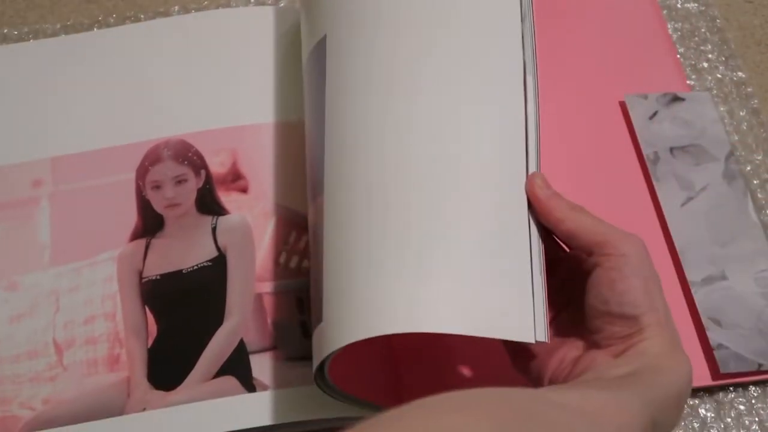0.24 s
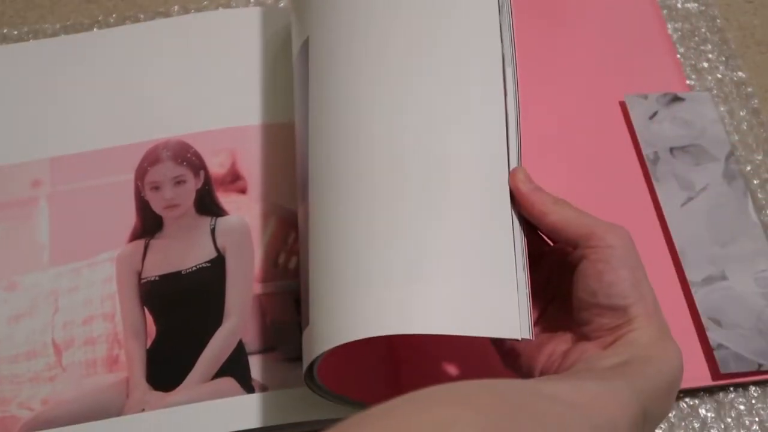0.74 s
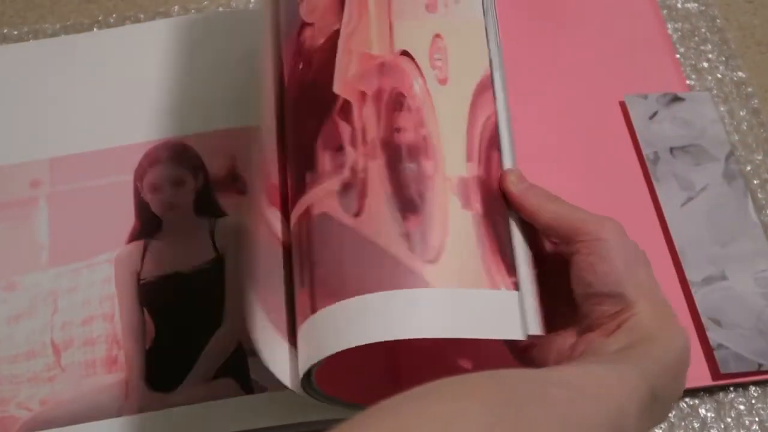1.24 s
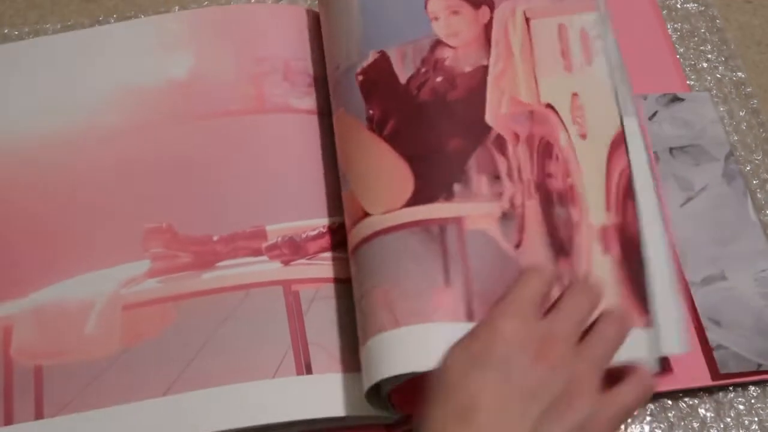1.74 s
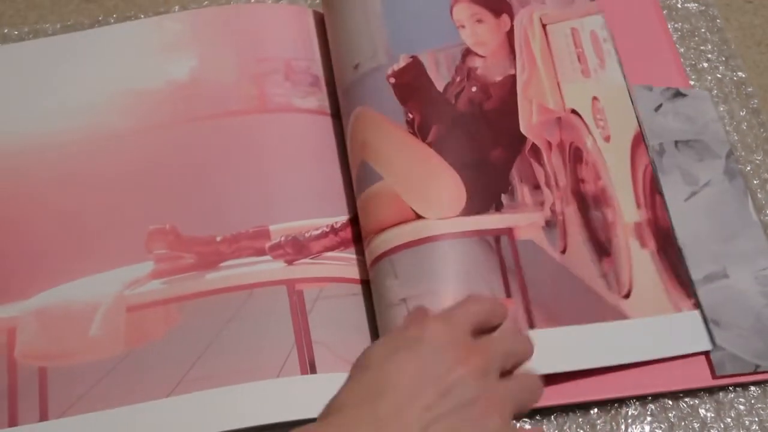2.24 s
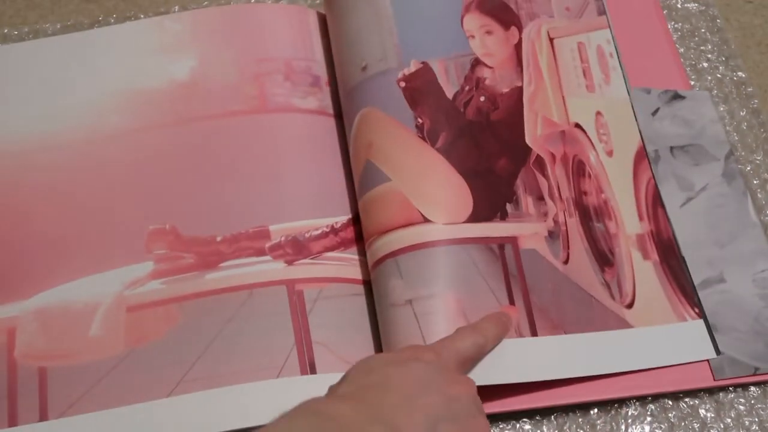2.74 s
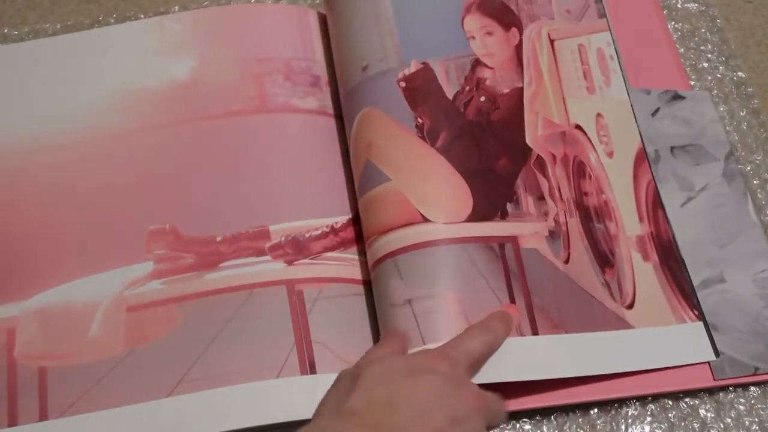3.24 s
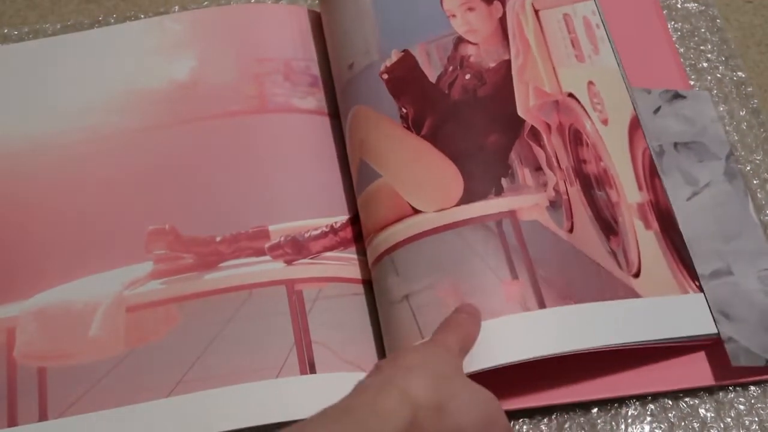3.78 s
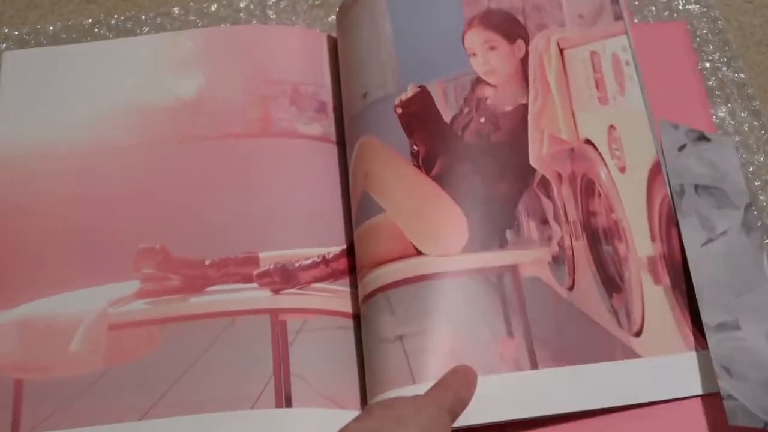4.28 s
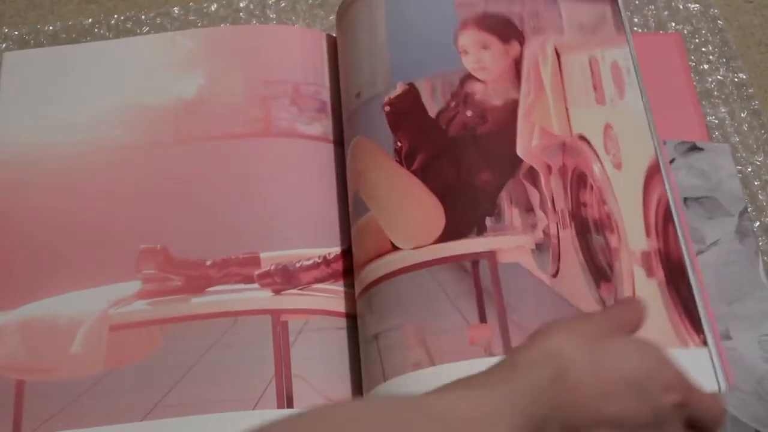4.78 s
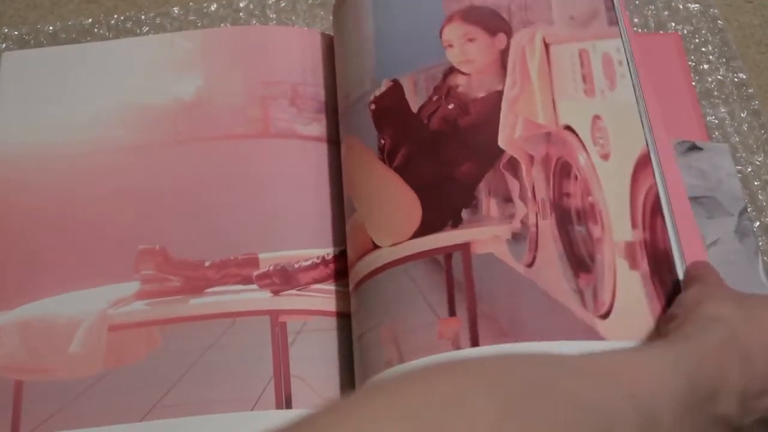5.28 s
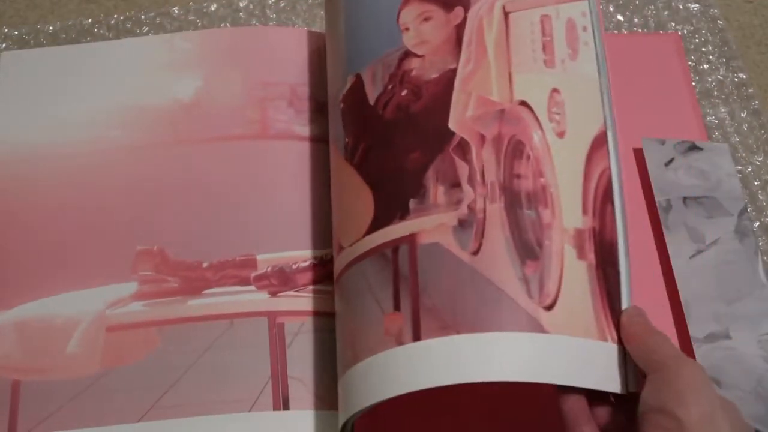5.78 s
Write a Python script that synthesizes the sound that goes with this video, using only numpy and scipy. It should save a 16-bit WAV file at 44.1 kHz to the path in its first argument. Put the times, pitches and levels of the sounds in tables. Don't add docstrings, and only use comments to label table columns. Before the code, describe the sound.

Stiff glossy pages of a large book are turned by hand, with faint rustles, papery flaps and a sharp loud snap over quiet room rumble.

```python
import sys
import numpy as np
from scipy import signal
from scipy.fft import rfft, irfft
from scipy.io import wavfile
from scipy.ndimage import uniform_filter1d

SR = 44100
rng = np.random.default_rng(int(sys.argv[2]) if len(sys.argv) > 2 else 0)


def to_wav(sig):
    pcm = np.clip(np.atleast_2d(sig), -1, 1) * 32767
    pcm = np.round(pcm).astype(np.int16)
    wavfile.write(sys.argv[1], SR, pcm.T)


def how_loud(loudness_db):
    steps = np.asarray(loudness_db, float) / 20
    return 10 ** steps


N = 265482
TOP_HZ = 13150


def evened(x):
    return x / np.sqrt(np.mean(x ** 2) + 1e-20)


def read(points, hz):
    f, value = np.transpose(points)
    return np.interp(np.log(hz + 1), np.log(f + 1), value)


def add(mix, s, sound):
    part = mix[round(s * SR):][:len(sound)]
    part += sound[:len(part)]


def fall(t60, rise_s):
    t = np.arange(9000) / SR
    return (1 - np.exp(-t / rise_s)) * how_loud(-60 * t / max(t60, .01))


def shaped(x, envelope):
    return x * envelope * np.linalg.norm(envelope) / np.linalg.norm(x * envelope)


def resonate(x, hz, width):
    r = np.exp(-np.pi * width / SR)
    return signal.lfilter([1 - r, 0, r - 1], [1, -2 * r * np.cos(2 * np.pi * hz / SR), r * r], x)


def sheet(x, modes):
    return evened(sum(how_loud(db) * resonate(resonate(x, hz, w), hz, 3 * w) for hz, w, db in modes))


def bent(modes, bend):
    return [(hz * b, w, db) for (hz, w, db), b in zip(modes, bend)]


def crackle(shape, spread_db, clump_s):
    clumps = evened(uniform_filter1d(rng.standard_normal(shape), max(round(clump_s * SR), 1)))
    return evened(rng.standard_normal(shape) * how_loud(spread_db * clumps))


def air():
    # (frequency [Hz], level per Hz [dB])
    floor = [(12, -49), (20, -16.5), (107, -5.5), (184, -15.5), (276, -14.5), (308, -13), (404, -16),
             (732, -20.5), (1010, -22), (1260, -22.5), (1790, -25), (2340, -26), (12900, -45.5),
             (16800, -68), (22000, -120)]
    # (frequency [Hz], likeness [-1 to 1])
    likeness = [(60, 1), (120, 0.98), (240, 0.27), (480, -0.51), (950, -0.18), (1890, -0.47), (3770, -0.27),
                (7520, -0.17), (15000, -0.08)]
    floor_db, step_db = -51, 16
    frames, hz = N // 512 + 5, np.fft.rfftfreq(2048, 1 / SR)
    a, b, c, d, patches = rng.standard_normal((frames, 1025, 5)).T
    patches = evened(uniform_filter1d(uniform_filter1d(patches, 20, axis=0), 6, axis=1))
    same = np.clip(read(likeness, hz), -1, 1)[:, None]
    both = np.sqrt((1 + same) / 2) * (a + 1j * b)
    apart = np.sqrt((1 - same) / 2) * (c + 1j * d)
    colour_db = read(floor, hz) - step_db * (hz > TOP_HZ)
    z = np.array([both + apart, both - apart]) * how_loud(colour_db[:, None] + 1.5 * patches)
    return how_loud(floor_db) * evened(signal.istft(z, nperseg=2048, noverlap=1536)[1][:, :N])


def whine():
    # (frequency [Hz], level [dB])
    tones = [(13018, -78.5)]
    t, sides = np.arange(N) / SR, np.array([[0.95], [-0.95]])
    return sum(np.sqrt(2) * how_loud(db) * np.sin(2 * np.pi * hz * t + sides) for hz, db in tones)


def drone():
    # (time [s], level [dB])
    swell = [
        (0, -66),
        (.12, -56),
        (.3, -61),
        (.7, -59),
        (.9, -60),
        (1.2, -53),
        (1.45, -57),
        (1.8, -59.5),
        (2.0, -65),
        (2.2, -78),
    ]
    s, db = np.transpose(swell)
    t = np.arange(N) / SR
    turn = 2 * np.pi * 142.1 * t
    level = how_loud(np.interp(t, s, db, right=-120))
    return np.sqrt(2) * level * np.sin(turn + np.array([[.3], [-.3]]))


def room(x):
    # (frequency [Hz], t60 [s])
    walls = [(200, 0.39), (1000, 0.039), (4000, 0.19), (12000, 0.27)]
    taps = np.zeros((2, SR // 2))
    starts = np.arange(200, SR // 2 - 20, 20)
    at = starts + rng.integers(0, 20, (2, len(starts)))
    np.put_along_axis(taps, at, rng.choice([-1., 1.], at.shape), 1)
    hz, t, z = signal.stft(taps, SR, nperseg=256)
    tail = signal.istft(z * how_loud(-60 * t / read(walls, hz)[:, None]), SR, nperseg=256)[1]
    return signal.fftconvolve(x[None], tail / np.linalg.norm(tail[0]), axes=1)[:, :N]


def ports(x):
    # (frequency [Hz], level [dB])
    difference = [(60, -32), (180, -37), (550, -52), (1650, -18), (4970, 2.5), (15000, 12.5)]
    hz, t, z = signal.stft(x, SR, nperseg=128)
    phase = 2 * np.pi * rng.random(z.shape[::-1]).T
    gain = how_loud(read(difference, hz) - 5.5)[:, None]
    apart = signal.istft(z * np.exp(1j * phase) * gain, SR, nperseg=128)[1][:N]
    return np.array([x + apart, x - apart])


def pile(x):
    # (frequency [Hz], width [Hz], level [dB])
    book_modes = [(300, 60, -2), (405, 50, -2), (590, 70, 2), (1120, 110, 2), (1650, 150, -4),
                  (1990, 160, 2), (2720, 200, 0), (3600, 260, 2), (5300, 300, -4)]
    through_db, past_db = -5.6, -2
    through = sum(how_loud(db) * resonate(x, hz, w) for hz, w, db in book_modes)
    return how_loud(past_db) * x + how_loud(through_db) * through


def drag():
    # (time [s], frequency [Hz], level [dB])
    path = [(1.72, 3500, -75), (1.76, 3800, -66), (1.83, 4200, -63), (1.88, 5000, -58), (1.92, 6040, -61),
            (1.97, 4560, -61), (2.02, 3800, -68), (2.1, 3000, -95), (3.3, 2200, -95), (3.36, 2400, -55),
            (3.39, 2680, -48), (3.44, 2800, -57), (3.5, 3000, -72), (4.7, 4200, -90), (4.77, 4200, -57),
            (4.84, 4000, -80), (5.18, 4000, -73), (5.28, 4200, -60)]
    s, hz, db = np.transpose(path)
    t = np.arange(N) / SR
    turn = np.exp(2j * np.pi * np.cumsum(np.interp(t, s, hz)) / SR)
    r = np.exp(-np.pi * 1100 / SR)
    hiss = (turn * signal.lfilter([1], [1, -2 * r, r * r], crackle(N, 2.2, .003) / turn)).real
    return how_loud(np.interp(t, s, db, left=-120, right=-120)) * evened(hiss)


def rub():
    # (time [s], pressure [dB], flat of the hand against fingertip [dB])
    strokes = [(0.0, -66.5, 2.5), (0.92, -67, 6.5), (1.38, -66.5, 2), (1.77, -63, 5), (1.906, -56.5, -3.5),
               (2.08, -52, 6.5), (2.22, -59, 10), (2.35, -52, 6), (2.5, -66.5, 0.5), (3.3, -66.5, 11),
               (3.4, -58.5, 5.5), (3.62, -62, 6), (3.95, -57.5, 4), (4.1, -48.5, 3), (4.234, -55, 2.5),
               (4.36, -61.5, 2.5), (5.2, -64, 3), (6.02, -66, 9)]
    place_hz = [170, 450, 1400, 3700, 7500, 15000]
    flat_share = [2.2, 0.67, 0.077, -0.48, -0.44, -1.64]
    s, pressure_db, flat_db = np.transpose(strokes)
    hz, t, z = signal.stft(crackle(N, 1.6, 0.011), SR, nperseg=512, noverlap=384)
    place_db = np.array([[-6], [15], [6.5], [7.5], [0], [-6]])
    levels_db = pressure_db + np.outer(flat_share, flat_db) + place_db
    in_time = np.array([np.interp(t, s, db) for db in levels_db])
    place = np.interp(np.log(hz + 1), np.log(place_hz), np.arange(len(place_hz)))
    low = np.minimum(place.astype(int), len(place_hz) - 2)
    field_db = in_time[low] + (place - low)[:, None] * (in_time[low + 1] - in_time[low])
    patches = uniform_filter1d(rng.standard_normal(z.shape[::-1]).T, 3, axis=0)
    patches = evened(uniform_filter1d(patches, 10, axis=1))
    return signal.istft(z * how_loud(field_db + 1.46 * patches), SR, nperseg=512, noverlap=384)[1][:N]


def both_kinds(dull, fizz_db, crisp, note_db):
    dull_rows = [(s, db, hz, db + low_db, db + fizz_db, span) for s, db, hz, span, low_db in dull]
    crisp_rows = [(s, db, hz, db + note_db, db + top_db, span) for s, db, hz, span, top_db in crisp]
    return sorted(dull_rows + crisp_rows)


def rustle(slips, bend, envelope, db, hz, note_db, fizz_db, width, wide):
    # (frequency [Hz], width [Hz], level [dB])
    scrape_modes = [(1090, 276, 21.6), (1550, 120, 19), (2000, 270, 42)]
    swish_modes = [(2580, 300, 1), (2860, 140, 2), (3400, 310, 3), (4200, 160, 2.5), (4760, 940, -3)]
    fizz_modes = [(6100, 1960, 19.5), (8300, 4700, 6), (10600, 11000, -13)]
    body = sheet(slips, bent(swish_modes, bend)) + 0.72 * sheet(slips, bent(scrape_modes[1:], bend[::-1]))
    ring = evened(resonate(resonate(slips, hz, width), hz, 4 * width))
    patch = shaped(ring + wide * how_loud(0.057 * (db + 49)) * body, envelope)
    note = shaped(sheet(slips, scrape_modes[:2]), envelope)
    fizz = shaped(sheet(slips, fizz_modes), envelope)
    return how_loud(db) * patch + how_loud(note_db) * note + how_loud(fizz_db) * fizz


def brushes():
    # (time [s], peak [dB], ring [Hz], length [s], low note [dB])
    pads = [(1.831, -47.5, 3880, 0.12, -17), (1.9836, -43, 3700, 0.083, -16),
            (2.0294, -44, 3670, 0.15, -12), (2.25, -50, 1890, 0.055, 6.5), (2.278, -64, 3400, 0.031, -15.5),
            (3.3435, -41.5, 2000, 0.18, -6), (3.364, -38, 2700, 0.14, -17),
            (3.3837, -34, 2300, 0.075, -2.5), (3.474, -43.5, 3000, 0.042, 2.5),
            (3.568, -45.5, 1900, 0.079, -3), (4.2005, -37.5, 1860, 0.084, -3.5),
            (4.2994, -52, 3360, 0.07, -1), (4.76, -45, 3460, 0.08, -15), (4.8415, -49.5, 3360, 0.043, 1),
            (4.891, -50, 3400, 0.097, -4), (5.2666, -44, 3260, 0.075, -16), (5.72, -49.5, 2380, 0.05, -5),
            (5.9765, -50, 2500, 0.092, -5)]
    # (time [s], peak [dB], ring [Hz], length [s], crispness [dB])
    swipes = [(1.528, -56.5, 2400, 0.09, 3), (1.742, -47.5, 3840, 0.25, -5), (1.8664, -51, 4000, 0.13, 5.5),
              (1.917, -55, 2000, 0.053, 8.5), (3.418, -40.5, 2000, 0.061, -8),
              (3.712, -44.5, 1960, 0.057, -3.5), (4.489, -47.5, 2980, 0.064, -2),
              (4.51, -43.5, 2000, 0.069, -3.5), (4.571, -46.5, 1840, 0.087, -4.5),
              (4.597, -46, 3530, 0.059, -1), (4.652, -68, 5670, 0.15, 12), (4.762, -56, 6000, 0.083, 4.5),
              (4.97, -52, 3400, 0.045, -4), (5.225, -47.5, 4200, 0.11, -8.5), (5.53, -53, 2630, 0.12, -6)]
    rows = both_kinds(pads, -15, swipes, -4)
    out, t = np.zeros(N), np.arange(9000) / SR
    bends = 1 + 0.079 * rng.standard_normal((len(rows), 5))
    slips = crackle((len(rows), 9000), 2.2, .002)
    for (s, *colour, length), slip, bend in zip(rows, slips, bends):
        u = t / (0.22 * max(length, .01))
        add(out, s - .008, how_loud(-9.5) * rustle(slip, bend, u * np.exp(1 - u), *colour, 370, 0.79))
    return out


def ticks():
    # (time [s], peak [dB], frequency [Hz])
    releases = [(1.0084, -41, 2210), (1.4591, -43, 4550), (1.714, -37, 2310), (2.0727, -52, 3880),
                (2.079, -20, 2930), (2.093, -21, 3660), (2.0974, -34, 3630), (2.3375, -17.5, 2900),
                (2.075, -27, 4700), (2.349, -28, 4000), (2.0855, -30, 3000), (1.7125, -32, 1500),
                (3.835, -38, 3800), (4.1128, -14, 620), (2.137, -36, 3400), (2.181, -38, 3000),
                (2.206, -38, 2000), (2.234, -39, 2100), (2.258, -39, 1300), (2.29, -40, 900),
                (4.19, -36, 1200), (4.227, -38, 4500), (4.254, -39, 3300), (4.155, -34, 2500),
                (3.917, -37, 2800), (3.7, -39, 2100), (2.598, -39, 5140), (3.69, -20.5, 6100),
                (3.834, -36, 2090), (3.87, -24, 2600), (3.874, -18, 2060), (3.882, -36, 3000),
                (3.9, -33, 2500), (4.0142, -22, 2740), (4.012, -24, 3600), (4.1083, -10.5, 3400),
                (4.115, -21, 2670), (4.12, -14, 1600), (4.1215, -16, 3500), (4.113, -19, 890),
                (4.05, -32, 3500), (4.071, -32, 3500), (4.165, -32, 3000), (4.214, -34, 2000),
                (4.074, -34, 1500), (3.652, -38, 1500), (2.221, -36, 1500), (4.1088, -11, 900),
                (4.133, -22, 3500), (4.168, -33, 4000), (4.3, -42, 3420), (4.4403, -30.5, 2000),
                (4.596, -32, 3450), (5.134, -45, 3550), (5.4056, -36, 1090), (5.9495, -41, 1500)]
    out, t = np.zeros(N), np.arange(400) / SR
    for s, db, hz in releases:
        add(out, s + 0.000997, -how_loud(db + 2) * np.sin(2 * np.pi * hz * t) * np.exp(-t * hz * 2.2))
    return signal.lfilter(*signal.butter(2, [500, 7500], "band", fs=SR), out)


def rings():
    # (time [s], peak [dB], frequency [Hz], t60 [s])
    damped_notes = [(0.452, -49, 1220, 0.074), (2.149, -45, 2610, .03), (2.19, -50, 2000, .03),
                    (2.25, -54, 2000, .3), (2.19, -44, 3590, .035), (2.221, -47.5, 1130, .12),
                    (2.249, -42, 3200, .02), (2.283, -45, 3500, .03), (2.315, -46, 2120, 0.067),
                    (3.512, -33, 714, 0.054), (3.65, -43, 300, .05), (3.69, -47, 270, 0.069),
                    (3.872, -42, 297, .15), (3.884, -29.5, 593, 0.088), (3.875, -36, 1090, 0.076),
                    (4.012, -36, 2780, 0.032), (4.03, -44, 1130, .05), (4.07, -41, 333, .08),
                    (4.109, -27.5, 1396, 0.12), (4.111, -40, 1000, .06), (4.111, -28.5, 1654, 0.062),
                    (4.119, -33, 1250, 0.1), (4.161, -33.5, 520, 0.13), (4.198, -48, 1950, .06),
                    (4.203, -41, 2700, .04), (4.203, -41, 3610, 0.057), (4.211, -47, 497, .1),
                    (4.441, -51, 3620, .08), (5.28, -56, 1080, .2), (5.975, -53, 1240, 0.19),
                    (1.459, -44, 650, 0.11), (1.784, -42.5, 316.6, 0.14), (1.825, -45, 325, 0.11),
                    (2.077, -34, 5970, 0.021), (2.0925, -31, 3610, 0.025), (2.0968, -21.5, 3630, 0.02),
                    (2.108, -36, 3610, 0.058), (2.3376, -28, 2000, 0.038), (2.3376, -20, 3500, 0.013),
                    (2.3485, -28, 2000, 0.06), (2.357, -36.5, 3690, 0.052), (3.5095, -41.5, 1607, 0.052),
                    (3.509, -40.5, 205, 0.12), (4.1093, -36, 3780, 0.041), (4.119, -41, 3680, 0.035),
                    (4.597, -56, 6100, .08), (4.884, -55.5, 5400, .08), (5.443, -46, 1034, 0.068),
                    (4.129, -34, 477, 0.16),
                    (2.34, -40, 1090, 0.12), (3.535, -45, 299, .15), (3.894, -45, 260, .15),
               (4.11, -36, 290, 0.087), (4.135, -37, 299, 0.16), (4.225, -41, 417, 0.079),
               (4.232, -45, 900, 0.07), (4.2, -47, 830, .12), (4.165, -40, 330, .07), (4.12, -44, 760, .06),
               (4.198, -42, 480, .05), (2.1, -40, 1100, .08), (2.078, -42, 1100, .05),
               (2.21, -50, 1130, .1), (3.509, -47, 3400, .03), (3.509, -52, 5000, .03),
               (2.33, -42, 1000, .04), (2.35, -40, 3900, .05), (2.384, -46, 3700, .05),
               (2.361, -38, 700, .05), (2.12, -46, 3450, .05), (2.145, -57, 5300, .1),
               (3.385, -42, 2100, .05), (3.367, -44, 2500, .05), (3.408, -46, 1100, .06),
               (3.42, -45, 2000, .05), (3.84, -48, 600, .04), (4.013, -36, 3600, .025),
               (1.72, -46, 650, .04), (1.745, -48, 950, .05), (1.81, -48, 750, .06), (1.726, -46, 130, .08),
               (4.755, -55, 4200, .1), (0.07, -54, 4000, .03), (0.22, -57, 3250, .05),
               (1.46, -53, 3400, .06), (5.96, -54, 2600, .1), (4.598, -51, 1106, .07),
               (4.142, -37, 560, .08), (4.215, -41.5, 598, .1), (3.873, -40, 1550, .06),
               (4.013, -40, 1700, .06), (4.85, -48.5, 993, 0.13), (5.133, -51, 3700, 0.037),
               (5.95, -55, 790, .04)]
    out, t = np.zeros(N), np.arange(9000) / SR
    for s, db, hz, t60 in damped_notes:
        add(out, s, how_loud(db) * np.sin(2 * np.pi * hz * t) * fall(t60, 0.00073))
    return out


def flaps():
    # (time [s], peak [dB], ring [Hz], t60 [s])
    landings = [(1.011, -53.5, 285, 0.14), (1.225, -69, 290, 0.1), (1.458, -43.5, 640, 0.15),
                (1.716, -41.5, 282, 0.15), (1.744, -45.5, 600, 0.56), (1.784, -46.5, 288, 0.12),
                (1.815, -49.5, 330, 0.2), (2.082, -39.5, 270, 0.26), (2.092, -27, 597, 0.34),
                (2.252, -49, 580, 0.26), (2.337, -36.5, 590, 0.24), (2.481, -44, 573, 0.081),
                (3.5105, -24, 620, 0.059), (3.525, -45, 600, 0.14), (3.689, -46, 390, 0.095),
                (3.835, -47, 600, 0.11), (3.875, -34, 275, 0.096), (3.885, -31.5, 600, 0.19),
                (4.014, -28.5, 439, 0.044), (4.029, -38, 400, 0.25), (4.1105, -25, 335, 0.05),
                (4.124, -25.5, 410, 0.32), (4.163, -34.5, 498, 0.12), (4.206, -38.5, 440, 0.13),
                (4.379, -51, 518, 0.092), (4.486, -43.5, 585, 0.079), (5.404, -42, 252, 0.075),
                (5.688, -49.5, 790, 0.17), (5.821, -50.5, 336, 0.11), (5.949, -55, 630, 0.12)]
    # (frequency [Hz], width [Hz], level [dB])
    body_modes = [(205, 23.5, 5.5), (314, 123, 1), (416, 160, -3), (583, 128, 5)]
    out, t = np.zeros(N), np.arange(9000) / SR
    for (s, db, hz, t60), slips in zip(landings, crackle((len(landings), 9000), 2.3, 0.0091)):
        clean = 0.28 + 0.09 * (db + 33.5) - 0.54 * (t60 - .12) + 0.53 * np.log2(hz / 420)
        clean = np.clip(clean, 0, .9)
        slap = how_loud(-5.5 + 1.3 * (db + 31)) * sheet(slips, [(1160, 230, 0)])
        rattle = 0.63 * evened(resonate(slips, hz, 117)) + 0.72 * sheet(slips, body_modes) + slap
        ring = 1.16 * np.sin(2 * np.pi * hz * t) * fall(0.073, 0.00075)
        rise_s = 0.00066 * how_loud(0.5 * max(-34 - db, 0))
        add(out, s, how_loud(db) * (clean * ring + (1 - clean) * shaped(rattle, fall(t60, rise_s))))
    return out


def snaps():
    # (time [s], peak [dB], ring [Hz], t60 [s], low note [dB])
    buckles = [(0.0722, -44.5, 4050, 0.063, -3), (0.2173, -45, 2310, 0.11, -1.5),
               (0.7138, -48, 2300, 0.091, 1), (1.1712, -47.5, 2630, 0.13, -3), (1.2792, -50, 2500, 0.13, 0),
               (2.071, -26.5, 1900, 0.22, -2), (2.0904, -30.5, 3680, 0.11, 4),
               (2.0971, -27.5, 3490, 0.066, 3), (2.149, -43, 2570, 0.12, -10),
               (2.1899, -44, 1920, 0.15, -3), (2.4633, -44.5, 2860, 0.32, -18),
               (3.509, -43, 1750, 0.11, -12), (3.8365, -44, 2130, 0.16, 1), (4.0123, -23, 2650, 0.081, -10),
               (4.0485, -32, 1780, 0.07, -13), (4.0693, -36, 1990, 0.083, -15),
               (4.1322, -26.5, 2310, 0.24, -14.5), (4.4412, -47, 3500, 0.47, 0.5),
               (5.1332, -42.5, 3680, 0.23, -1.5), (5.404, -59, 2000, 0.11, -1), (5.441, -46, 3200, 0.2, -3)]
    # (time [s], peak [dB], ring [Hz], t60 [s], crispness [dB])
    edge_snaps = [(0.4522, -56, 4300, 0.12, -1), (1.007, -52, 2260, 0.074, 5.5),
                  (1.456, -50, 4550, 0.25, 0), (1.7117, -43, 2300, 0.23, -12.5),
                  (2.3365, -24.5, 1900, 0.15, -17.5), (2.348, -39, 2000, 0.055, -11),
                  (2.5974, -55, 5230, 0.17, 9.5), (3.6913, -39, 6000, 0.076, -2),
                  (3.8696, -32, 2700, 0.2, -8), (4.108, -14, 2570, 0.078, -5.5),
                  (4.1184, -20, 3690, 0.081, -9), (4.164, -43.5, 4040, 0.3, 3.5),
                  (5.9483, -47, 2580, 0.12, -6)]
    rows = both_kinds(buckles, -14, edge_snaps, -4)
    out, bends = np.zeros(N), 1 + 0.043 * rng.standard_normal((len(rows), 5))
    slips = crackle((len(rows), 9000), 3., .0015)
    for (s, *colour, t60), slip, bend in zip(rows, slips, bends):
        add(out, s, how_loud(-10.5) * rustle(slip, bend, fall(t60, 0.00027), *colour, 140, 0.99))
    return out


def scene():
    book = pile(rub()) + snaps() + brushes() + ticks() + rings() + flaps()
    background = air() + drone() + whine()
    return ports(book) + how_loud(-10.0) * room(book) + background + ports(drag())


def top_cut(x):
    return signal.sosfilt(signal.butter(12, 15660, fs=SR, output="sos"), x)


def record(dry):
    edge_hz = 14950
    hz = np.fft.rfftfreq(N, 1 / SR)
    slope_db = (hz > TOP_HZ) * -(2.0 + 0.8 * (hz - TOP_HZ) / 1000)
    edge_db = (hz > edge_hz) * (edge_hz - hz) / 30
    heard = irfft(rfft(dry) * how_loud(slope_db + edge_db), N)
    return top_cut(heard)


dry = scene()
out = record(dry)
to_wav(out)
```